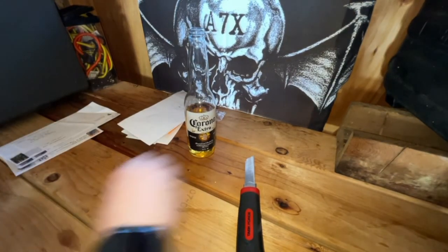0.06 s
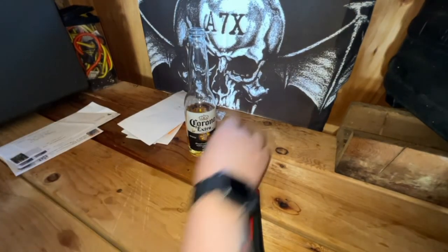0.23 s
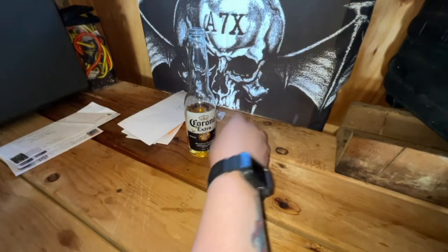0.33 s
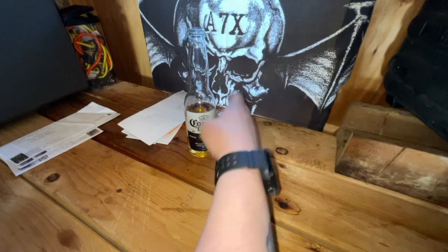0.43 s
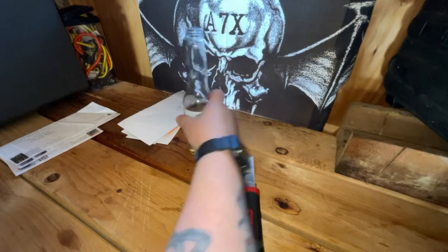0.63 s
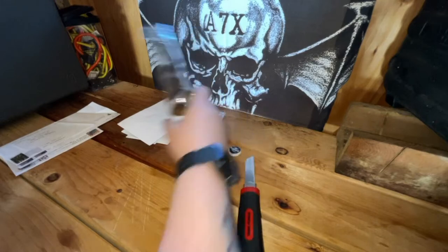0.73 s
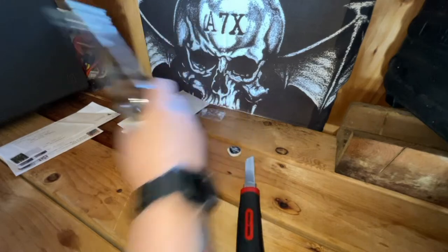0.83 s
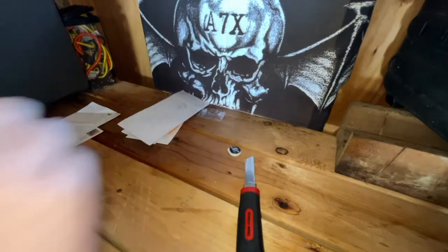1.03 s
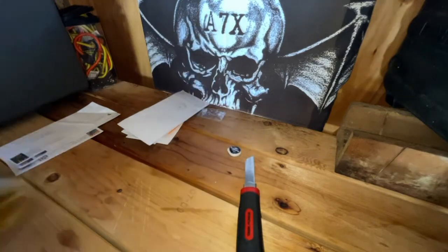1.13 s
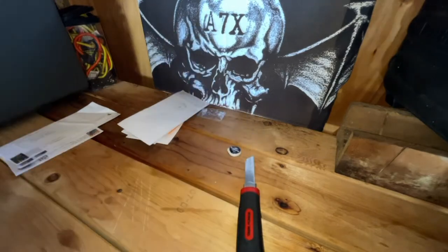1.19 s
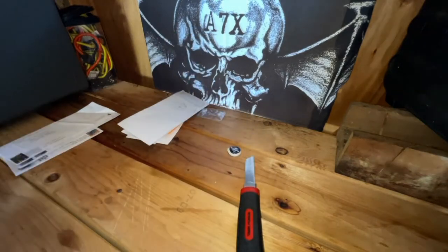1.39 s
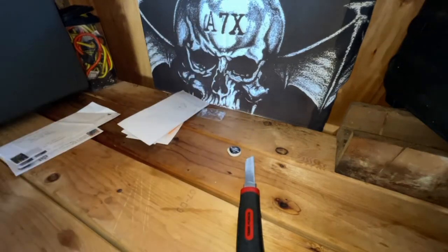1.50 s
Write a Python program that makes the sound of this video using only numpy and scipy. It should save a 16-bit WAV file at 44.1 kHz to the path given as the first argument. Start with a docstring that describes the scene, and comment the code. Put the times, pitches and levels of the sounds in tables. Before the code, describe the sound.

A glass bottle knocks sharply on a wooden table, then clinks and bumps softly as lifted away

```python
"""A low wavering hum, dull room noise and faint hiss, all made from sines and filtered noise, run throughout.
A glass bottle on a wooden table in a small room takes a sharp double knock: hard clicks ring its modes.
A soft bump of the heel follows at once on the boards, then come light clinks as a hand grips the glass.
As it is lifted, its heel rocks with dull bumps that ring the table top, amid soft brushes of filtered noise.
Two much fainter brushes come later. Reflections and a decaying tail give the sense of the room."""
import sys
import numpy as np
from scipy import signal
from scipy.io import wavfile

SR = 44100
rng = np.random.default_rng(int(sys.argv[2]) if len(sys.argv) > 2 else 0)


def wav_out(sig):
    """Save sig, one row per channel (or a flat mono array), as 16-bit PCM at SR to the path in sys.argv[1]."""
    wavfile.write(sys.argv[1], SR, np.round(np.clip(np.atleast_2d(sig).T, -1, 1) * 32767).astype(np.int16))


N = 68355  # length in samples


def amp(db):
    """Turns decibels into a gain."""
    return 10 ** (np.asarray(db) / 20)


def unit(x):
    """Scales a sound to an rms level of 1."""
    return x / np.sqrt(np.mean(x ** 2) + 1e-20)


def level_curve(points, t):
    """Turns (seconds, dB) points into a smoothly joined gain over time."""
    seconds, db = np.transpose(points)
    return amp(np.interp(t, seconds, db))


def read(points, hz):
    """Reads a value between the points of a spectrum, on a log-frequency axis."""
    f, value = np.transpose(points)
    return np.interp(np.log(hz + 1), np.log(f), value)


def add(mix, s, sound):
    """Mixes a sound in, starting at s seconds."""
    start = max(round(s * SR), 0)
    part = mix[start:][:len(sound)]
    part += sound[:len(part)]  # part is a view, so this changes mix


def colour(x, db_at):
    """Filters x with the gain db_at(Hz); minimum phase keeps the response after each input."""
    size = 4096
    hz = abs(np.fft.fftfreq(size, 1 / SR)) + 1
    log_gain = np.log(amp(np.maximum(db_at(hz), -100)))
    response = np.exp(np.conj(signal.hilbert(log_gain)))
    taps = np.fft.ifft(response).real[:size // 2]
    return signal.fftconvolve(x, taps)[:len(x)]


def noise(spectrum):
    """Makes steady noise of rms 1 with the given spectrum."""
    white = rng.standard_normal(N + SR)
    shaped = colour(white, lambda f: read(spectrum, f))
    return unit(shaped[SR:])  # skip the filter's start


def fade(t, t60):
    """Exponential decay that falls 60 dB in t60 seconds."""
    return np.exp(-np.log(1000) * t / t60)


def ring_mode(t, hz, t60):
    """One vibration mode: a sine that dies away exponentially."""
    return fade(t, t60) * np.sin(2 * np.pi * hz * t)


# How fast the room's tail dies. Each row: frequency in Hz, time to fall 60 dB in seconds.
ROOM_DECAY = [(150, 0.25), (700, .22), (2300, 0.2062), (5000, 0.16), (9000, 0.11), (15000, 0.15)]
ROOM_ONSET_S = 0.0063


def room(x):
    """Scattered echoes form a diffuse tail, with each frequency dying at its own speed."""
    t = np.arange(SR // 2) / SR
    signs = rng.choice([-1., 1.], len(t))
    taps = signs * (rng.random(len(t)) < 5000 / SR)  # about 5000 echoes per second
    hz, when, bands = signal.stft(taps, SR, nperseg=256)
    decay = amp(-60 * when / read(ROOM_DECAY, hz)[:, None])
    tail = signal.istft(bands * decay, SR)[1][:len(t)]
    tail *= np.minimum(t / ROOM_ONSET_S, 1) ** 2
    return signal.fftconvolve(x, tail / np.linalg.norm(tail))[:N]


# First reflections off table and wall. Each row: delay in seconds, gain as a plain factor.
EARLY_ECHOES = [(.0020, .35), (.0057, .2), (.0089, .2), (0.0109, .15), (0.0187, .1)]


def reflected(x):
    """Sound straight from the source, plus delayed copies off nearby surfaces."""
    out = x.copy()
    for delay, gain in EARLY_ECHOES:
        add(out, delay, gain * x)
    return out


# How the low hum comes and goes. Each row: time in seconds, level in dB before HUM_DB is added.
HUM_LEVEL = [(0.0, -32.5), (0.056, -35), (0.252, -37.5), (0.282, -50), (0.328, -41.5), (0.478, -42),
             (0.49, -38.5), (0.56, -46), (0.594, -32.5), (0.658, -44), (0.7, -32.5), (0.738, -52),
             (0.76, -38), (0.866, -45), (0.884, -56), (0.924, -39.5), (0.964, -56.5), (0.98, -42),
             (1.078, -38), (1.106, -53), (1.138, -41), (1.232, -35), (1.31, -56), (1.356, -41.5),
             (1.378, -55), (1.42, -38.5), (1.45, -50), (1.464, -44), (1.55, -44)]
HUM_DB, OCTAVE_DB = 1.5, -18.5  # overall shift; octave relative to the main tone
HUM_HZ, HUM_SAG_HZ_PER_S = 56.93, 1.2
HUM_WAVER = 0.21  # rms phase wobble in radians


def hum():
    """A slowly sagging low tone and its weak octave, with a phase that wobbles at 5 to 16 Hz."""
    t = np.arange(N) / SR
    phase = 2 * np.pi * np.cumsum(HUM_HZ - HUM_SAG_HZ_PER_S * t) / SR
    wobble = sum(np.sin(2 * np.pi * (f * t + rng.random())) for f in np.geomspace(5, 16, 10))
    phase += HUM_WAVER * unit(wobble)
    tone = np.sin(phase) + amp(OCTAVE_DB) * np.sin(2 * phase)
    return amp(HUM_DB) * level_curve(HUM_LEVEL, t) * unit(tone)


# Tone of the room noise. Each row: frequency in Hz, relative strength in dB per Hz.
AIR_SPECTRUM = [(25, -8.5), (48, 1), (72, 13.5), (100, 5.5), (170, 1), (300, -1), (450, -6.5), (700, -6.5),
                (1300, -8), (2200, -12), (3200, -22), (5000, -31.5), (8000, -41.5)]
# Loudness of the room noise. Each row: time in seconds, level in dB.
AIR_LEVEL = [(0, -45.5), (.45, -47.5), (.8, -49.5), (1.25, -48), (1.55, -47)]
# Tone of the steady microphone hiss. Each row: frequency in Hz, relative strength in dB per Hz.
HISS_SPECTRUM = [(1000, 3.5), (5000, -1.5), (8000, -2), (12000, -7.5), (13000, -8.5), (15000, -10)]
HISS_DB = -75.5


def background():
    """The hum over random noise: dull, gently changing room noise and faint steady hiss."""
    t = np.arange(N) / SR
    air = noise(AIR_SPECTRUM) * level_curve(AIR_LEVEL, t)
    return hum() + air + amp(HISS_DB) * noise(HISS_SPECTRUM)


# Glass and hand brush on the wood.
# Each row: centre in seconds, half length in seconds, level in dB, centre pitch in Hz, width in octaves.
BRUSH_STROKES = [(0.411, 0.037, -51, 1540, 0.99), (.49, .03, -68, 14500, .06), (0.515, 0.036, -51, 1780, 1),
                 (.698, 0.0027, -64, 14500, .2), (1.432, 0.057, -80, 5360, 0.42)]


def brushes():
    """Friction is noise around one pitch, softly swelling and fading."""
    t, out = np.arange(N) / SR, np.zeros(N)
    for s, half, db, hz, octaves in BRUSH_STROKES:
        white = rng.standard_normal(N)
        rub = colour(white, lambda f: -6 * (np.log2(f / hz) / octaves) ** 2)
        swell = np.exp(-((t - s) / half) ** 2)
        out += amp(db) * unit(rub) * swell
    return out + amp(-6) * room(out)


# The heel bumps on the boards.
# Each row: start in seconds, level in dB, pitch in Hz above which the contact excites the boards less.
HEEL_BUMPS = [(.2475, -30, 1300), (0.5033, -31, 500), (0.5116, -21, 380), (0.5248, -21.5, 250),
              (0.54, -26, 190)]
# Modes of the table top. Each row: frequency in Hz, relative level in dB, time to fall 60 dB in seconds.
BOARD_MODES = [(168, -11.5, .13), (233.5, -5, 0.087), (295.4, 0, 0.068), (438.8, -5, 0.042),
               (560, -7, 0.058), (714, -7, 0.038), (921, -9.5, .04)]
BUMP_RISE_S, WOOD_WET_DB = 0.002514, -10  # WOOD_WET_DB sets the room tail


def table():
    """The bottle's heel thumps the low modes of the boards; a softer contact favours the lowest."""
    t = np.arange(SR // 3) / SR
    rise = 1 - np.exp(-t / BUMP_RISE_S)
    out = np.zeros(N)
    for s, bump_db, top_hz in HEEL_BUMPS:
        thump = np.zeros(len(t))
        for hz, db, t60 in BOARD_MODES:
            softness = 1 / np.sqrt(1 + (hz / top_hz) ** 4)
            thump += amp(db) * softness * ring_mode(t, hz, t60)
        add(out, s, amp(bump_db) * thump * rise)
    return out + amp(WOOD_WET_DB) * room(out)


# Contacts on the glass. Each row: start in seconds, ring level in dB, click level in dB, grit level in dB,
# treble tilt in dB per octave, place struck (rounded to 0, 1, 2 or 3),
# factor on each mode's ring time (below 1, the grip shortens the ring).
CONTACTS = [(.2351, -10, -21, -22.5, -3.5, 0.5, 0.59), (.2433, -0.5, 2.5, -10, .5, 0, 0.97),
            (.3797, -32.5, -20, -31, -6, 1, 1.37), (0.3918, -46, -17, -37.5, -5.5, 1.5, 1.9),
            (.4928, -34, -28, -31.5, -7, 2, 0.69), (0.5136, -41, -32, -38, -7, 0, 0.75),
            (.5420, -31.5, -25, -35, -7, 3, 0.47)]
# Modes of the bottle. Each row: frequency in Hz, time to fall 60 dB in seconds before the contact's factor,
# then four relative levels in dB, for a strike at place 0, 1, 2 and 3.
GLASS_MODES = [(1702, 0.046, -15.5, -24, -12, -26), (2396, 0.078, -33, -19, -5, -8),
               (3888, .05, -25, -36, -29, -26), (4300, 0.11, -17.5, -17, -14, -4),
               (4421, .085, -19, -20, -18, -7), (4537, 0.093, -24.5, -3, -16.5, -7),
               (4610, 0.16, -24, -5, -9.5, 0.5), (4995, .025, -7.5, -20, -15, -20),
               (5087, 0.032, -1.5, -4, 4.5, -8), (5145, .115, -18, -8, -6, -12),
               (6578, .09, -37, -10, -3, -36), (7240, 0.074, -33, -26, -24, -17),
               (9400, .07, -25, -17.5, -17, -19.5), (10600, 0.049, -33, -30, -26, -22),
               (11805, .027, -12.5, -23, -14, -17), (13378, .12, -43, -33, -23, -30),
               (14360, 0.0412, -31.5, -36, -24, -38), (14950, .05, -28.5, -25, -20, -33)]
# Tone of click and chatter before the tilt. Each row: frequency in Hz, relative gain in dB.
CLICK_SPECTRUM = [(110, -23.5), (260, -4), (700, 0), (1000, -2.5), (1600, -1.5), (3000, -2), (4800, -0.5),
                  (6000, -3), (8000, -6), (9500, -3), (12000, -14.5), (12900, -20.5), (14800, -15),
                  (16000, -23)]
SWELL_S = 0.001  # rise time of the ring
CLICK_T60_S, CHATTER_T60_S, CHATTER_DB = 0.0055, 0.044, 0
RING_WET_DB, CLICK_WET_DB = -14.5, -4  # room tail of rings and clicks


def glass_ring(t, place, free):
    """The place struck sets how strongly each glass mode rings; the grip changes how long."""
    ring = np.zeros(len(t))
    for hz, t60, *place_dbs in GLASS_MODES:
        ring += amp(place_dbs[round(place)]) * ring_mode(t, hz, t60 * free)
    return ring * (1 - np.exp(-t / SWELL_S))


def contact_click(t, click_db, grit_db, tilt_db):
    """A hard contact is one sharp impulse plus gritty chatter that soon dies away."""
    grit_fade = fade(t, CLICK_T60_S) + amp(CHATTER_DB) * fade(t, CHATTER_T60_S)
    grit = rng.standard_normal(len(t)) * grit_fade
    force = amp(click_db) * (t == 0) + amp(grit_db) * grit

    def tone(f):
        """The tilt pivots at 3000 Hz and levels off below 1200 Hz."""
        return read(CLICK_SPECTRUM, f) + tilt_db * np.log2(np.maximum(f, 1200) / 3000)

    return colour(force, tone)


def bottle():
    """Each contact clicks and sets the glass ringing, heard directly and through the room."""
    t = np.arange(SR // 2) / SR
    rings, clicks = np.zeros((2, N))
    for s, ring_db, click_db, grit_db, tilt_db, place, free in CONTACTS:
        add(rings, s, amp(ring_db) * glass_ring(t, place, free))
        add(clicks, s, contact_click(t, click_db, grit_db, tilt_db))
    to_room = amp(RING_WET_DB) * rings + amp(CLICK_WET_DB) * clicks
    return reflected(rings + clicks) + room(to_room)


def scene():
    """Room sounds, light brushing, table and bottle add up at one microphone."""
    mix = background() + brushes() + table() + bottle()
    return mix[None]


CEILING, CUTOFF_HZ = .85, 15900  # ceiling as a share of full scale


def record(dry):
    """Slight overload rounds off the knock's peak; then a filter removes the highest treble."""
    held = dry / (1 + (dry / CEILING) ** 8) ** (1 / 8)
    low_pass = signal.firwin(401, CUTOFF_HZ, window=("kaiser", 9), fs=SR)
    return signal.oaconvolve(held, low_pass[None], "same")


dry = scene()
out = record(dry)
wav_out(out)
```